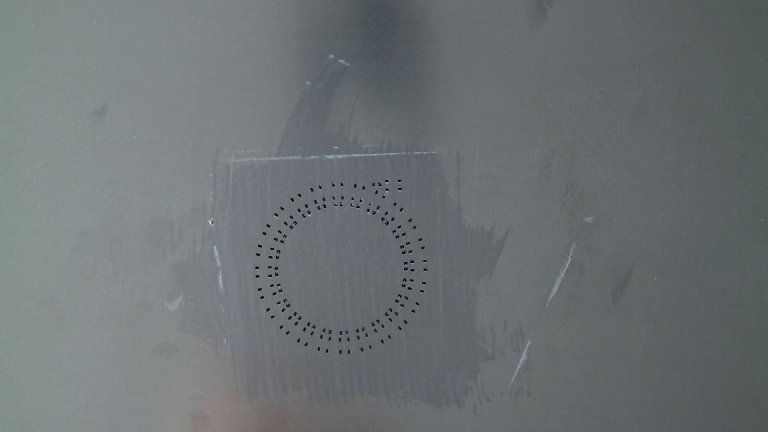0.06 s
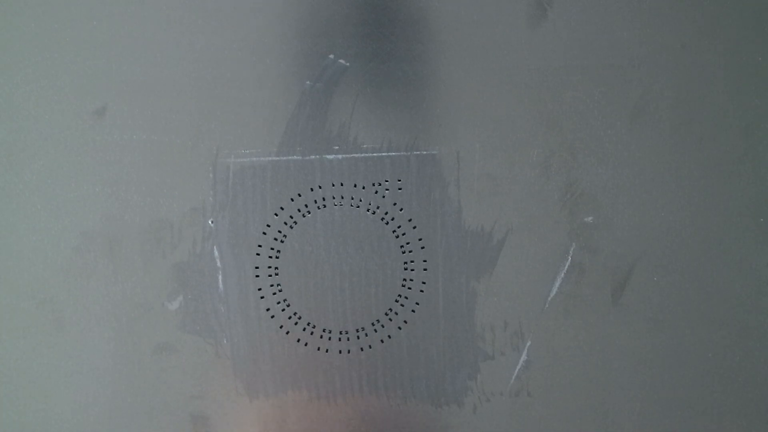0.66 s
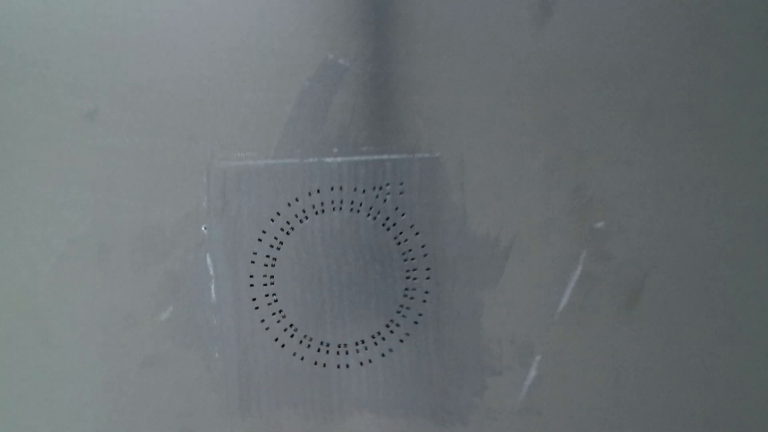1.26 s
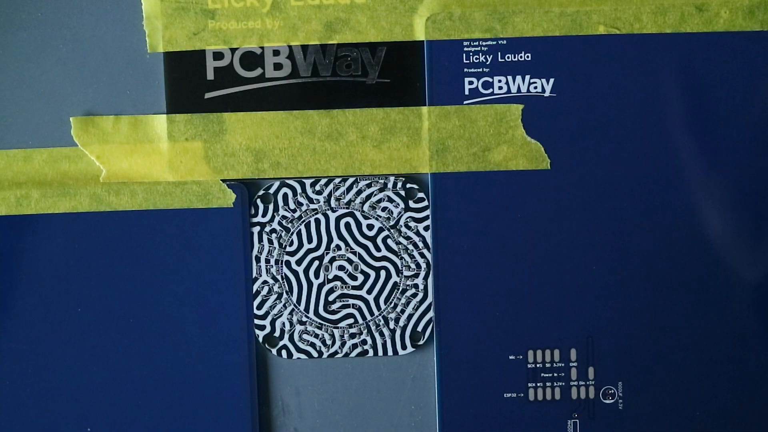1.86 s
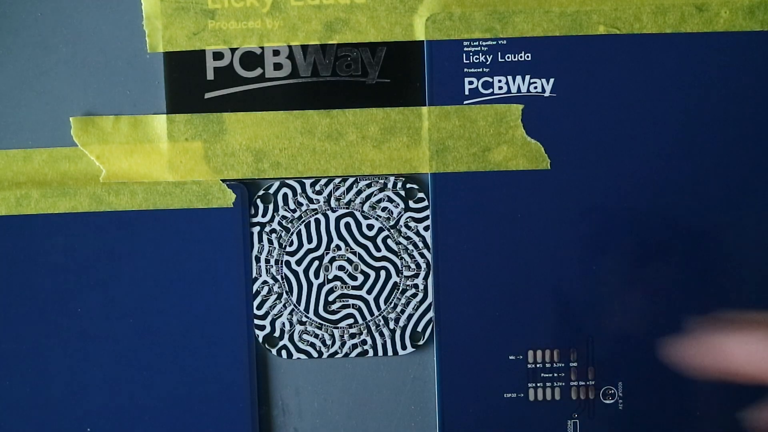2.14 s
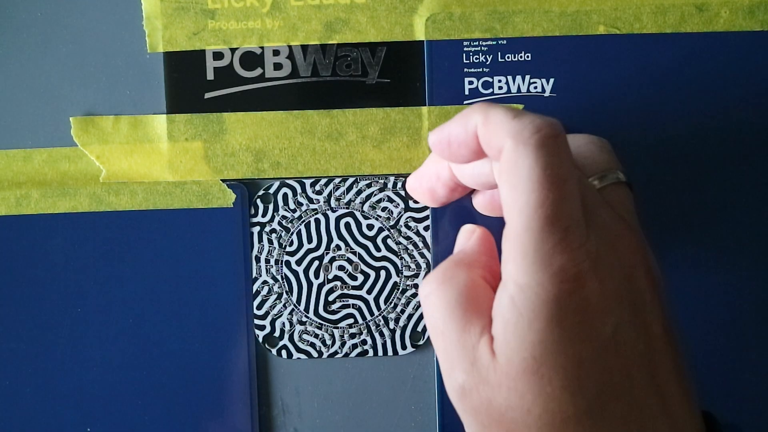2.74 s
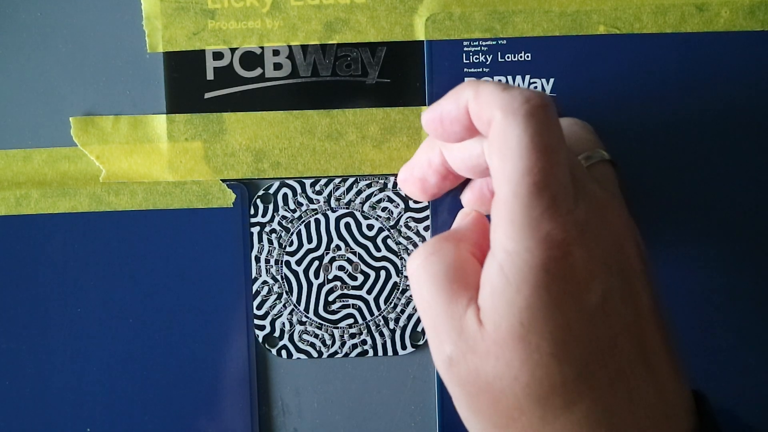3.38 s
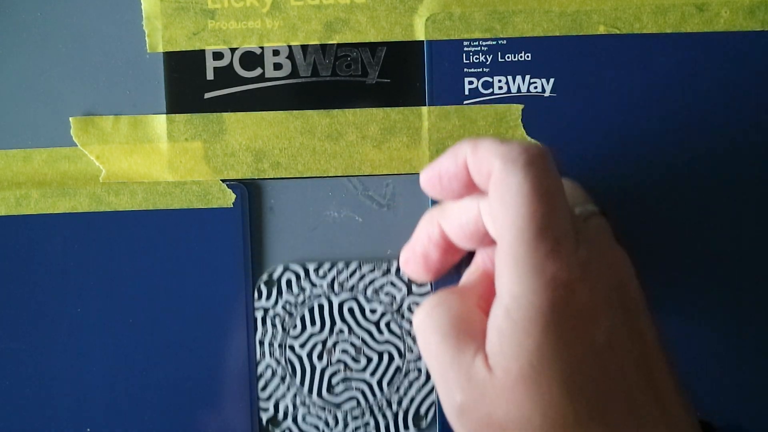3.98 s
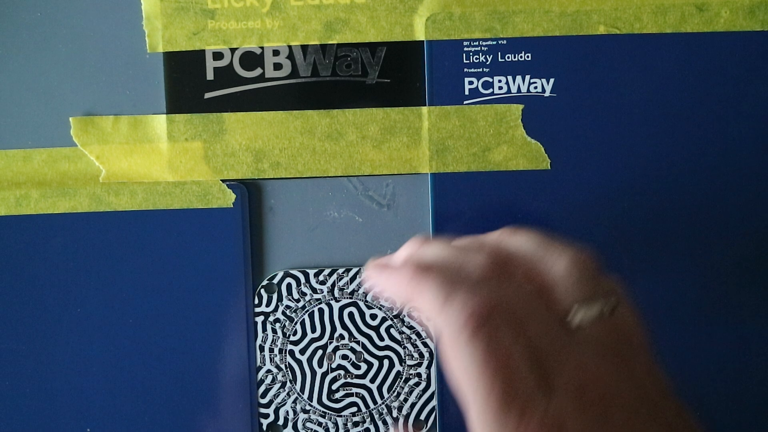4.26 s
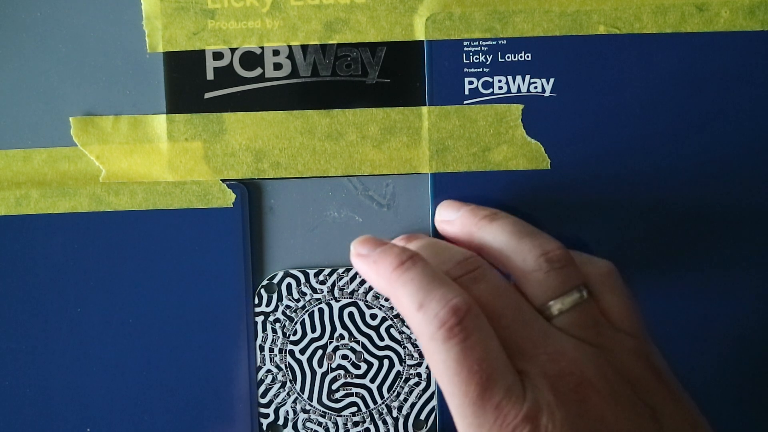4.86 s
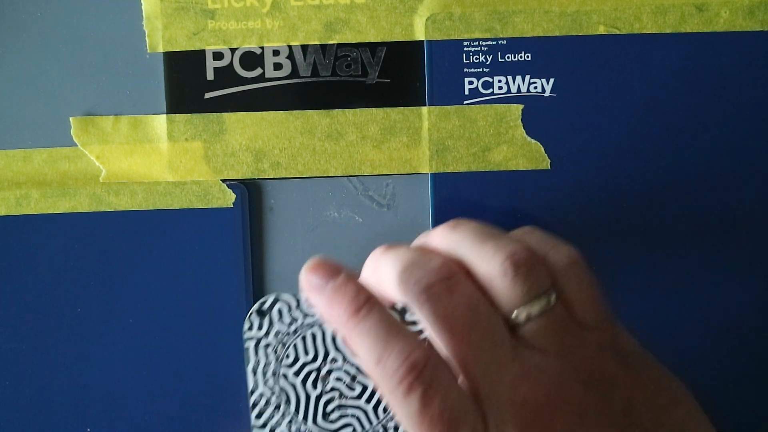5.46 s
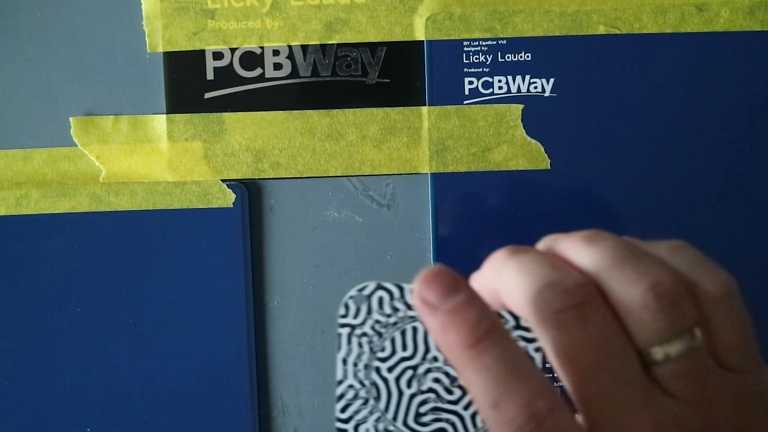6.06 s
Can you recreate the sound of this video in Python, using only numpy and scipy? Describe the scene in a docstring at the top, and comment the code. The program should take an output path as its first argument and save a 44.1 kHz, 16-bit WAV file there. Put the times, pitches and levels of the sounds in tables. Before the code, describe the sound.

Light ticks and a snap, then a thin metal sheet lands with a hollow, rattling boom; a small board scrapes along a workbench and taps down.

```python
"""A workbench in a small room, close to a stereo microphone; a fan hums faintly. A squeegee stroke dies
away on a metal stencil taped down along one edge. Fingers pick at the sheet; it drags, snaps free of the
paste, swings over on its tape hinge and lands with a hollow, rattling boom as its modes ring. A hand
passes the microphone, nudges the small circuit board and slides it across the bench in two grating
pushes, until the board tips down with a tap."""
import sys
import numpy as np
from scipy import signal
from scipy.fft import rfft, irfft
from scipy.io import wavfile

SR = 44100
rng = np.random.default_rng(int(sys.argv[2]) if len(sys.argv) > 2 else 0)


def int16_out(signal):
    """Quantize to a 16-bit WAV file."""
    q = np.round(np.clip(np.atleast_2d(signal).T, -1, 1) * 32767)
    wavfile.write(sys.argv[1], SR, q.astype(np.int16))


N = 274302
TIME = np.arange(N) / SR


def from_db(db):
    """Decibels to gain."""
    return 10 ** (np.asarray(db) / 20)


def rms_one(x):
    """Scale to rms 1."""
    return x / np.sqrt(np.mean(x ** 2) + 1e-20)


def at_hz(points, hz):
    """Read a table on a log-frequency axis."""
    points = np.array(points)
    return np.interp(np.log(hz), np.log(points[:, 0]), points[:, 1])


def pan(db):
    """Channel gains of constant total power, the left db above the right."""
    return rms_one(from_db(np.array([[db], [-db]]) / 2))


def butter(x, hz, kind, order=2):
    """Causal Butterworth filter."""
    sos = signal.butter(order, np.clip(hz, 10, .45 * SR), kind, fs=SR, output="sos")
    return signal.sosfilt(sos, x + 1e-18)


def resonate(x, hz, width):
    """Two-pole resonance with gain 1 at its peak."""
    r = np.exp(-np.pi * width / SR)
    feedback = [1, -2 * r * np.cos(2 * np.pi * hz / SR), r * r]
    return signal.lfilter(np.array([1, 0, -1]) * (1 - r * r) / 2, feedback, x + 1e-18)


def fade(t60, size=SR):
    """Exponential decay from 1."""
    return np.exp(-np.log(1000) * TIME[:size] / t60)


def ring(hz, t60, size=SR):
    """One struck mode."""
    return np.sin(2 * np.pi * hz * TIME[:size]) * fade(t60, size)


def add(out, s, sound):
    """Mix a sound in at time s."""
    start = max(round(s * SR), 0)
    out[..., start:start + sound.shape[-1]] += sound[..., :N - start]


def noise(colour, likeness, size=N):
    """Stereo noise of rms 1; likeness is the left-right correlation along frequency."""
    hz = np.maximum(np.fft.rfftfreq(size, 1 / SR), 1)
    skirts = np.minimum(1, np.minimum(hz / colour[0][0], colour[-1][0] / hz)) ** 2
    mid, side = rfft(rng.standard_normal((2, size))) * from_db(at_hz(colour, hz)) * skirts
    alike = np.clip(at_hz(likeness, hz), -1, 1)
    spectrum = np.sqrt(1 + alike) * mid + np.sqrt(1 - alike) * side * [[1], [-1]]
    return rms_one(irfft(spectrum, size))


def trim_hiss(x, top_hz=12600):
    """Steep low-pass for the airy sounds."""
    return signal.sosfilt(signal.ellip(8, .5, 60, top_hz, fs=SR, output="sos"), x)


# Room tone at the bench: f/Hz, relative level/dB
AIR_COLOUR = [(15, -62), (25, -48), (48, -18), (87, -15), (155, -5), (202, -4.5), (225, -6.5), (309, -2),
              (403, -5.5), (511, -7.5), (632, -6.5), (1290, -10.5), (8470, -33), (12300, -41.5),
              (14000, -65.5)]
# Room tone across the microphone pair: f/Hz, correlation
AIR_LIKENESS = [(60, -0.12), (130, 0.033), (290, -0.64), (640, -0.55), (1410, -0.45), (3100, -0.076),
                (6820, -0.19), (15000, -0.28)]
# Fan in the background: f/Hz, width/Hz, level/dB
FAN_HUMS = [(201.8, 19, -71), (300, 5.1, -77.5), (483, 60, -68)]
def room_tone(air_db=-58):
    """Steady room air with the narrow hums of a fan."""
    air = from_db(air_db) * noise(AIR_COLOUR, AIR_LIKENESS)
    hum = sum(from_db(db) * rms_one(resonate(air, hz, width)) for hz, width, db in FAN_HUMS)
    return trim_hiss(air + hum) * pan(-1.4)


# Close sources across the microphone pair: f/Hz, correlation
NEAR_LIKENESS = [(100, 0.87), (400, 0.64), (1200, 0.7), (4000, 0.15), (12000, 0.11)]
def rub(gain, colour, grain_db, grain_hz):
    """Friction: tiny asperities catch and let go, so the hiss comes in uneven grains."""
    roughness = rms_one(butter(rng.standard_normal(N), grain_hz, "low"))
    return gain * rms_one(from_db(grain_db * roughness)) * noise(colour, NEAR_LIKENESS)


# Squeegee on the stencil, close, a little right: f/Hz, relative level/dB
STROKE_COLOUR = [(240, -28), (400, -5), (478, -12), (523, -23), (563, -10), (616, -4), (920, -3),
                 (1350, 1.5), (4520, -15.5), (5820, -7), (8960, -17.5), (14000, -45)]
def squeegee(db=-47.5, t60=0.42):
    """The blade rubs over the sheet, dying away from the start."""
    return rub(from_db(db) * fade(t60, N), STROKE_COLOUR, grain_db=1.0, grain_hz=300) * pan(-2.5)


def bumps(rows):
    """Each soft touch rings one low, damped mode."""
    out = np.zeros((2, N))
    for s, db, hz, t60 in rows:
        add(out, s, from_db(db) * pan(-1.5) * butter(ring(hz, t60), [hz / 2, 2 * hz], "band"))
    return out


# Hand on the bench top, near centre: t/s, level/dB, f/Hz, t60/s
HAND_REST = [(0.748, -51.5, 186, .14)]
def hand_rest():
    """A hand comes to rest with a dull bump."""
    return bumps(HAND_REST)


# Crunch of a contact, heard close: f/Hz, relative level/dB
TAP_COLOUR = [(100, -9.5), (400, -3), (1200, 4.5), (2100, 1), (3500, -2), (5500, -5.5), (6500, -21),
              (9000, -14.5), (14000, -53)]
# Modes of the bench under the board: f/Hz, relative level/dB, t60/s
BENCH_MODES = [(327, -1, 0.078), (378.3, -1.5, 0.34), (774, 2, 0.044), (1060, -9, 0.022)]
# Modes of a thin hard edge: f/Hz, relative level/dB, t60/s
EDGE_MODES = [(3490, -3, 0.077), (3620, 1.5, 0.17), (4990, -12, 0.0394), (6630, -13, 0.048),
              (7610, -12.5, .09)]
def contact(rows, hz, top_hz, t60, knock_db, ting_db, pan_db, crunch_share=0.27, overtone_db=-6.5):
    """A brief crunch in two damped bending modes; it also knocks the bench and rings the thin edge."""
    ringing = np.zeros(SR)
    for modes, strike_db in (BENCH_MODES, knock_db), (EDGE_MODES, ting_db):
        struck = sum(from_db(db) * ring(f, decay) for f, db, decay in modes)
        ringing += from_db(strike_db) * butter(struck, modes[0][0] * 0.45, "high")
    out, size = np.zeros((2, N)), SR // 4
    for s, db in rows:
        crunch = butter(noise(TAP_COLOUR, NEAR_LIKENESS, size), top_hz, "low")
        bending = resonate(crunch, hz, hz * 0.13)
        bending += from_db(overtone_db) * resonate(crunch, hz * 2.69, hz * 0.52)
        tick = rms_one(bending + crunch_share * crunch) * fade(t60, size)
        add(out, s, from_db(db) * butter(tick, 200, "high"))
        add(out, s, from_db(db) * ringing)
    return out * pan(pan_db)


# Fingers at the stencil's edge, close: t/s, level/dB, f/Hz, t60/s
PICKS = [(0.838, -53, 1450, 0.042), (1.027, -54, 1800, 0.26), (1.163, -50.5, 1740, 0.047),
         (1.406, -50, 1390, .04)]
def finger_picks():
    """The sheet ticks as fingers pick at it."""
    return sum(contact([(s, db)], hz, top_hz=2710, t60=t60, knock_db=-24, ting_db=-25, pan_db=-2.0)
               for s, db, hz, t60 in PICKS)


def slips(rows, attack_s, growth_db_per_s=0, release_t60=0.083):
    """Gain over time: each slip is an attack, a hold that may grow, and a release."""
    power = np.zeros(N)
    for s, length, db in rows:
        age = np.maximum(TIME - s, 0)
        held_db = db + growth_db_per_s * (np.minimum(age, length) - length / 2)
        fall_db = 60 * np.maximum(age - length, 0) / release_t60
        power += (np.minimum(age / attack_s, 1) * from_db(held_db - fall_db)) ** 2
    return np.sqrt(power)


# Stencil rising, close, a little right: t/s, length/s, level/dB
LIFT_SLIPS = [(1.37, .23, -64.5), (1.634, .04, -56), (1.684, .016, -50.5)]
# Its scrape: f/Hz, relative level/dB
LIFT_COLOUR = [(410, -33.5), (700, 1.5), (1240, -14), (1340, 0.5), (2890, -8.5), (3470, -4), (3970, -13),
               (5460, -13), (12100, -33), (13000, -41.5)]
def stencil_lift():
    """The sheet drags as it is raised, then swings over."""
    return rub(slips(LIFT_SLIPS, attack_s=0.0077), LIFT_COLOUR, grain_db=-1.5, grain_hz=200) * pan(-2.5)


# Faint squeaks during the lift and the second push: t/s, length/s, level/dB
SQUEAKS = [(1.388, .022, -61.5), (1.43, .15, -74), (5.228, 0.022, -54.5), (5.275, 0.068, -65)]
def edge_squeak(width_hz=50):
    """Friction keeps a thin edge's modes ringing where it drags."""
    friction = rng.standard_normal((2, N))
    singing = sum(from_db(db) * resonate(friction, hz, width_hz) for hz, db, _ in EDGE_MODES)
    return slips(SQUEAKS, attack_s=0.012) * rms_one(singing) * pan(-2.0)


# Stencil letting go, close, centre: t/s, level/dB
SNAPS = [(1.612, -37.5), (1.633, -28.5)]
def stencil_snaps():
    """The sheet snaps free of the paste."""
    return contact(SNAPS, hz=1249, top_hz=7000, t60=0.019, knock_db=-28.5, ting_db=-31.5,
                   pan_db=-0.5, overtone_db=-8.0)


# Stencil touching, landing and bouncing by the microphone: t/s, relative level/dB
LANDINGS = [(1.7188, -11), (1.7522, 0), (1.7712, -7), (1.7792, -8), (1.7998, -8), (1.8282, -10)]
# Modes of the sheet and the bench under it: f/Hz, level/dB, t60/s, left minus right/dB
SHEET_MODES = [(89.0, -47.3, 0.4, 7.0), (119.0, -46.6, 0.59, 4.0), (143.0, -37.6, 0.44, 2.0),
               (157.0, -32.7, 0.45, -2.0), (171.0, -36.5, 1.25, -2.0), (202.0, -33, 0.44, -5.0),
               (241.0, -29.4, 0.41, -11.0), (260.0, -32.4, 0.52, -7.0), (276.0, -35.5, 0.9, -13.0),
               (318.0, -26.2, 0.47, -11.0), (339.0, -21.5, 0.49, -9.0), (376.0, -26.1, 0.41, -7.0),
               (403.0, -27.4, 0.65, -14.0), (447.0, -34.7, 0.64, -5.0), (488.0, -24.1, 0.47, -14.0),
               (540.0, -29.1, 0.4, -8.0), (575.0, -30.6, 0.53, -7.0), (598.0, -27.6, 0.47, -4.0),
               (617.0, -30.5, 0.56, -1.0), (653.0, -33.8, 0.56, -1.0), (732.0, -29.6, 0.51, -3.0),
               (805.0, -35.0, 0.53, -2.0), (848.0, -38.8, 0.51, 4.0), (914.0, -37.6, 0.5, 1.0),
               (1055.0, -45.8, 0.58, -5.0), (1297.0, -46.8, 0.42, -4.0), (1475.0, -44.7, 0.42, 1.0)]
def stencil_landing():
    """Each landing is a short slap of trapped air; the hardest clacks and sets the sheet ringing."""
    size = 2 * SR
    slap = from_db(-3) * butter(ring(hz=370, t60=.022, size=size), [120, 1400], "band") * pan(-9.0)
    clack = from_db(-17) * butter(ring(hz=830, t60=0.033, size=size), [550, 1500], "band") * pan(-1.0)
    modes = sum((-1) ** k * from_db(db) * pan(pan_db) * ring(hz, t60, size)
                for k, (hz, db, t60, pan_db) in enumerate(SHEET_MODES))
    modes = butter(modes, 1843, "low")
    damped = from_db(-3) * butter(modes, 570, "low") * fade(.08, size)
    touch = butter(slap + damped, 803, "low")   # light touches are dull and soon damped
    rebound = butter(touch, 190, "high")   # with the air squeezed out, bounces have little bass
    strikes = [touch, slap + clack + modes] + [rebound] * (len(LANDINGS) - 2)
    out = np.zeros((2, N))
    for (s, db), strike in zip(LANDINGS, strikes):
        add(out, s, from_db(db) * strike)
    return out


# Dense wash of the boom: f/Hz, relative level/dB
BOOM_COLOUR = [(50, -34.5), (90, -14.5), (140, -7.5), (300, 7), (600, 0.5), (820, -5.5), (1050, -9),
               (1450, -16), (1950, -21), (2800, -32.5), (4300, -28), (6000, -50.5), (9000, -58)]
# Its decay: f/Hz, t60/s
BOOM_T60 = [(60, 0.43), (200, 0.79), (500, 0.66), (1200, 0.57), (3000, 0.51), (9000, .45)]
# Its spread across the microphone pair: f/Hz, correlation
BOOM_LIKENESS = [(80, .8), (250, 0.24), (600, -.2), (2000, -0.13)]
def stencil_boom(db=-18):
    """The sheet's crowd of weaker modes dies away band by band."""
    crowd = noise(BOOM_COLOUR, BOOM_LIKENESS, SR)
    edges_hz = np.geomspace(30, 15000, 10)
    boom = sum(butter(crowd, [lo, hi], "band") * fade(at_hz(BOOM_T60, np.sqrt(lo * hi)))
               for lo, hi in zip(edges_hz, edges_hz[1:]))
    boom *= from_db(db) * (1 - fade(0.0085))
    muffled = from_db(-2) * butter(boom, 600, "low", order=3) * fade(0.594)
    out = np.zeros((2, N))
    add(out, LANDINGS[0][0], muffled)
    add(out, LANDINGS[1][0], boom)
    return out


# Rim of the sheet, close, a little left: t/s, level/dB
CLATTER = [(1.773, -40.5)]
def rim_clatter():
    """The rim knocks on the bench just after the landing."""
    return contact(CLATTER, hz=2590, top_hz=6420, t60=.04, knock_db=-3, ting_db=-21.5, pan_db=2.0)


# Tape hinge, close, a little right: t/s, level/dB
CRACKLES = [(1.885, -56.5), (1.998, -59.5)]
def tape_crackles():
    """The tape crackles as it settles."""
    return contact(CRACKLES, hz=7440, top_hz=14000, t60=.15, knock_db=-24, ting_db=-24.5, pan_db=-2.5)


# Air from the moving hand, right on the microphone: peak t/s, half width/s, level/dB
PUFF = [(2.322, 0.022, -49)]
# Its rumble: f/Hz, relative level/dB
PUFF_COLOUR = [(35, -10), (70, -4.5), (160, -3), (300, -12)]
def air_puff(wake_db=-60, wake_t60=1.05):
    """A draught presses on one microphone port, draws on the other and leaves a fading wake."""
    draught = swells(PUFF)
    add(draught, PUFF[0][0], from_db(wake_db) * fade(wake_t60, N))
    return draught * noise(PUFF_COLOUR, likeness=[(30, -0.41), (200, -0.87)])


def swells(rows):
    """Gain over time: a smooth rise and fall for each movement."""
    return sum(from_db(db) * np.exp(-((TIME - s) / width) ** 2) for s, width, db in rows)


# Hand moving near the microphone: peak t/s, half width/s, level/dB
SWISHES = [(2.54, 0.15, -60), (4.21, 0.1, -62)]
# Its soft hiss: f/Hz, relative level/dB
SWISH_COLOUR = [(500, -9), (1400, 2), (2500, -5), (4000, -4), (5500, -8.5), (8000, -21.5), (13000, -41)]
def hand_swishes():
    """The hand brushes softly as it comes in and changes grip."""
    return trim_hiss(rub(swells(SWISHES), SWISH_COLOUR, grain_db=1.0, grain_hz=100)) * pan(-1.4)


# Fingertip on the board, close: t/s, level/dB
NUDGES = [(2.857, -54.5), (3.096, -54)]
def board_nudges():
    """A fingertip nudges the board with muted ticks."""
    return contact(NUDGES, hz=910, top_hz=2200, t60=0.029, knock_db=-12, ting_db=-34, pan_db=-2)


def board_bumps(lag_s=0.01114, hz=479, t60=0.11):
    """A dull bump of the board follows each nudge."""
    return bumps([(s + lag_s, db + 1, hz, t60) for s, db in NUDGES])


def push(rows, attack_s, creep_db=-16.5):
    """Gain over time: slips grow louder as they gather speed, with a faint creep between them."""
    start, last = rows[0][0], rows[-1][0]
    loudest_db = max(db for _, _, db in rows)
    creep = slips([(start, last - start, loudest_db + creep_db)], attack_s)
    return np.hypot(slips(rows, attack_s, growth_db_per_s=22), creep)


# Slips of the board in each push, close, a little right: t/s, length/s, relative level/dB
FIRST_PUSH = [(3.456, 0.02, -65.5), (3.513, 0.075, -48.5), (3.65, 0.017, -53.5), (3.712, 0.065, -56),
              (3.817, 0.2345, -52), (4.078, 0.0062, -54)]
SECOND_PUSH = [(5.036, .042, -60.5), (5.111, 0.034, -60), (5.216, .037, -53), (5.29, 0.055, -64)]
# Friction of each push: f/Hz, relative level/dB
FIRST_COLOUR = [(150, -43), (250, -14), (366, -6), (458, -15), (516, -4), (742, -4.5), (978, -6.5),
                (1140, -3), (1480, -8.5), (2440, -4), (4030, -10), (4710, -16.5), (5790, -14.5),
                (10400, -21.5), (15500, -35)]
SECOND_COLOUR = [(210, -39), (350, -0.5), (650, -4), (726, 3), (878, -10.5), (2930, -8), (3170, -12),
                 (3660, -9.5), (3960, -14), (7590, -17.5), (11700, -25), (15500, -52)]
# Resonances of the sliding board: f/Hz, width/Hz, relative level/dB
BOARD_MODES = [(760, 250, -3), (1190, 110, 5.5), (1616, 82, 2), (2500, 87, -2.5), (3120, 150, -4.5),
               (4050, 160, 0.5), (5850, 580, -4)]
def board_slides():
    """The board grates over the bench through its own resonances."""
    first = rub(push(FIRST_PUSH, attack_s=0.0079), FIRST_COLOUR, grain_db=2.0, grain_hz=905)
    second = rub(push(SECOND_PUSH, attack_s=0.02), SECOND_COLOUR, grain_db=2.0, grain_hz=400)
    friction = from_db(-1) * first + from_db(-0.5) * second
    body = sum(from_db(db) * resonate(friction, hz, width) for hz, width, db in BOARD_MODES)
    return butter(friction + from_db(-1.5) * body, 150, "high") * pan(-2.2)


# Board's edge chirping briefly, then the board meeting the bench, close, right of centre: t/s, level/dB
EDGE_CLICK = [(5.411, -50.5)]
BOARD_DROP = [(5.43, -33.5)]
def board_drop():
    """The board's edge gives a short bright chirp as it rubs, and the board drops flat."""
    click = contact(EDGE_CLICK, hz=7100, top_hz=13000, t60=0.035, knock_db=-14, ting_db=-4.5, pan_db=-1)
    tap = contact(BOARD_DROP, hz=825, top_hz=7000, t60=0.02, knock_db=-14, ting_db=-23,
                  pan_db=-4.0, crunch_share=0.3)
    return click + tap


def room(x, t60=0.42, top_hz=5000):
    """Diffuse reflections of a small room, different in each channel."""
    size = SR // 2
    tail = butter(rng.standard_normal((2, size)), top_hz, "low", order=1) * fade(t60, size)
    tail *= 1 - fade(0.023, size)   # the reflections take a moment to build
    return signal.fftconvolve(x, tail / np.sqrt(np.sum(tail ** 2) / 2), axes=1)[:, :N]


def scene():
    """The bench from close up, with a little of the room on the contacts and the rubbing."""
    contacts = finger_picks() + stencil_snaps() + rim_clatter() + tape_crackles()
    contacts += board_nudges() + board_drop()
    rubbing = squeegee() + stencil_lift() + edge_squeak() + board_slides()
    reflections = room(from_db(-11.0) * contacts + from_db(-11.5) * rubbing)
    # a low cut keeps deep rumble out of the boom
    sheet = butter(stencil_landing() + stencil_boom(), 64.6, "high", order=3)
    handling = hand_rest() + air_puff() + hand_swishes() + board_bumps()
    return room_tone() + contacts + rubbing + reflections + sheet + handling


def record(dry, cutoff_hz=15700):
    """A steep low-pass cuts the top of the microphone signal."""
    return signal.sosfilt(signal.ellip(10, .1, 80, cutoff_hz, fs=SR, output="sos"), dry)


dry = scene()
out = record(dry)
int16_out(out)
```